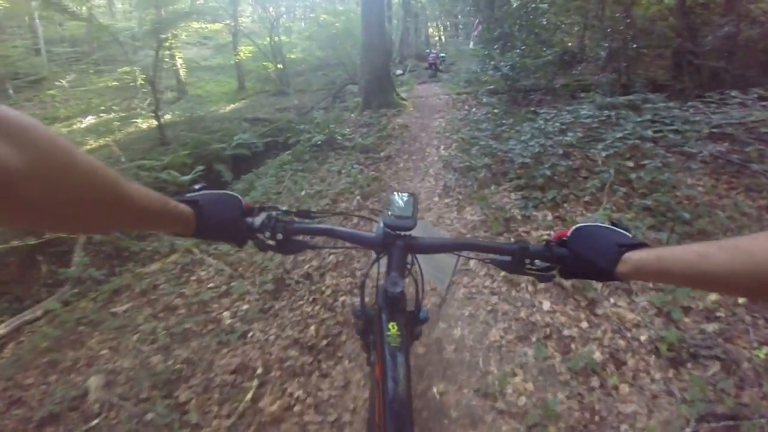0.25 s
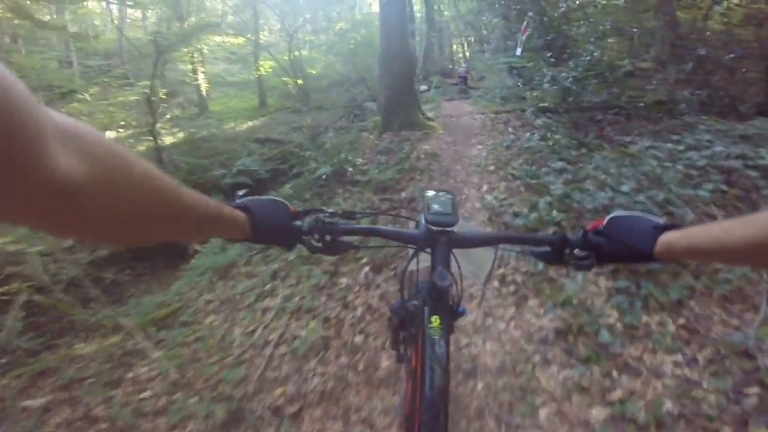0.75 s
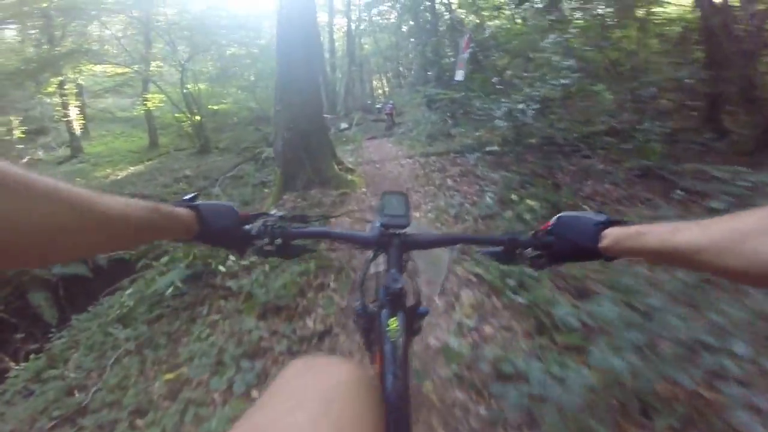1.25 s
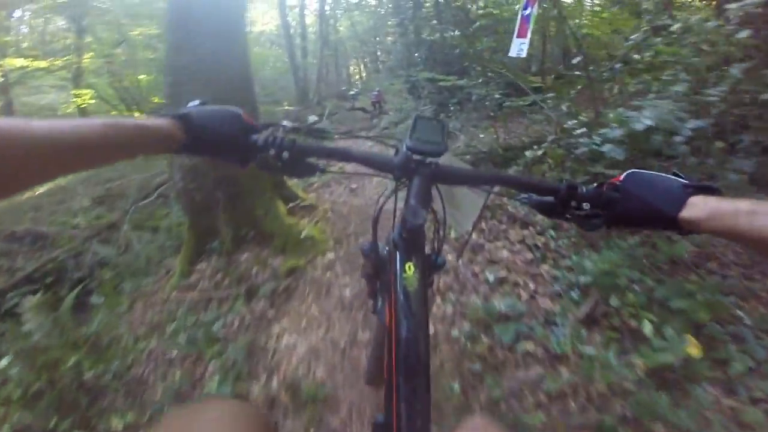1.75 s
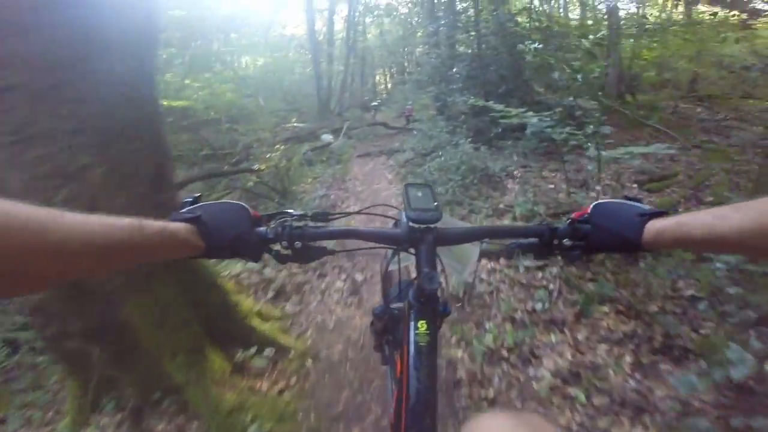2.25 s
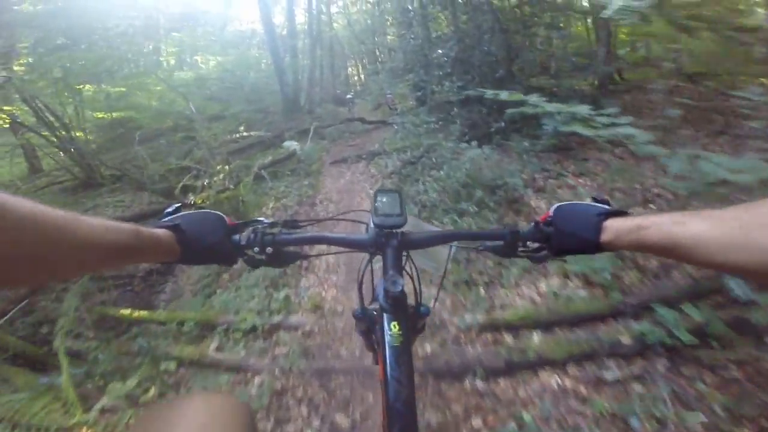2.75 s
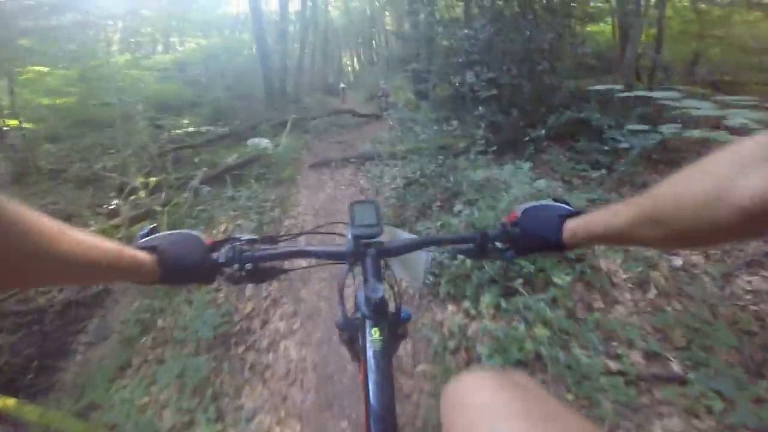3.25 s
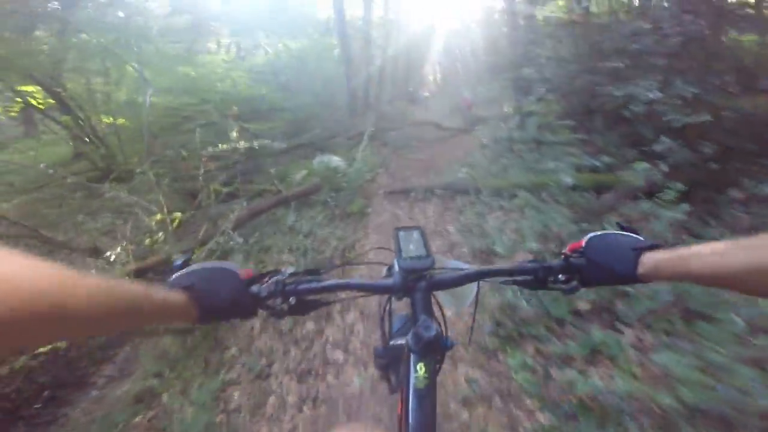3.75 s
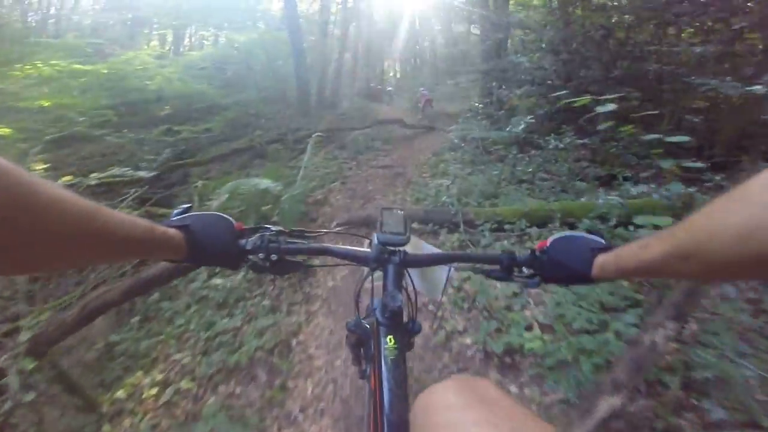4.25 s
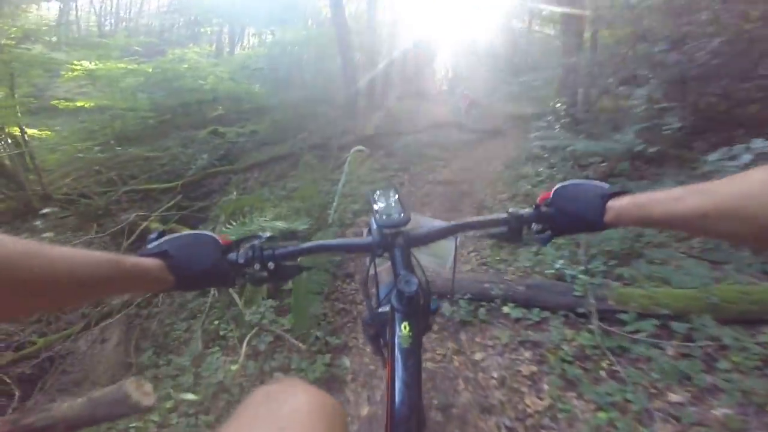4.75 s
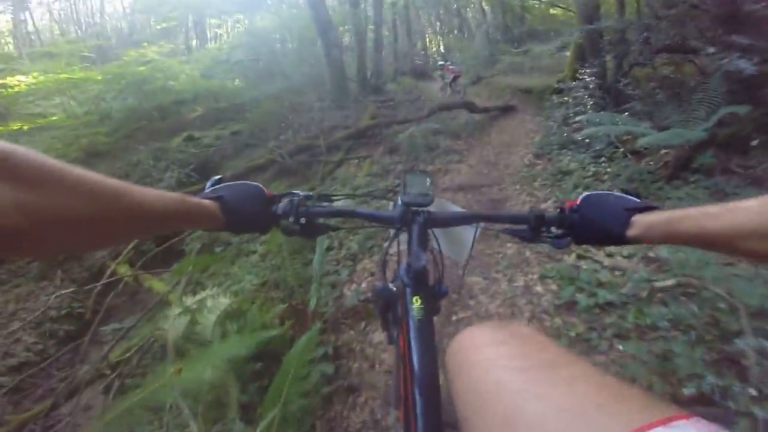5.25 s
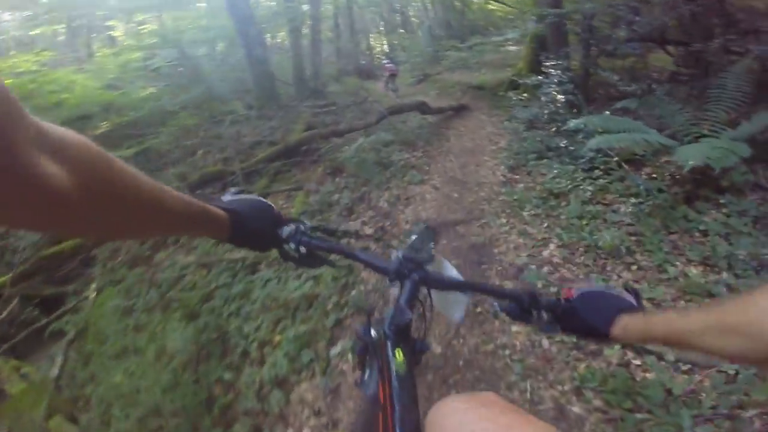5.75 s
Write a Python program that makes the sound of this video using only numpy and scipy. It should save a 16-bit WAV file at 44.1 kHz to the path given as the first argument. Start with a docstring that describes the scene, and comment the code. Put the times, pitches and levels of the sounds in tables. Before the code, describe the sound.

Close, boxed-in scuffs, rattles and faint leaf crackles over low body rumble, one early twig snap, then big jolts at about five seconds.

```python
"""Straps rub and a body sways over faint hiss and buzz throughout, with crackles, jolts and knocks scattered
among them and one ringing twig snap near the start: a camera in a closed case rides on a cyclist's chest
harness down a leafy forest trail, and little air sound gets in. Friction noise and short scrapes ring the
resonances of the case; shaped noise gives sway, shake and hiss; damped swings make the jolts, heavy over a log.
Clumped snaps make the leaves, a tearing burst the twig, a gated tone the buzz, resonant bursts the ticks."""
import sys
import numpy as np
from scipy import signal
from scipy.fft import rfft, irfft, next_fast_len
from scipy.io import wavfile
from scipy.ndimage import uniform_filter1d

SR = 44100
rng = np.random.default_rng(int(sys.argv[2]) if len(sys.argv) > 2 else 0)


def inscribe(sig):
    """Save sig as 16-bit PCM at rate SR to the path in sys.argv[1].

    A 1-D sig is mono; a 2-D sig holds one channel per row.
    Samples are clipped to [-1, 1] before scaling.
    """
    pcm = np.round(np.clip(np.atleast_2d(sig).T, -1, 1) * 32767)
    wavfile.write(sys.argv[1], SR, pcm.astype(np.int16))


N = 264361

# Resonances of the case: (frequency [Hz], width of each of two passes [Hz], level [dB])
CASE_MODES = [(330, 230, -10.5), (566, 255, -0.5), (980, 150, -10.5), (1539, 603, 8), (1850, 300, 5),
              (2277, 280, 11), (2644, 630, 3.5), (3460, 340, -7.5), (4210, 720, -7.5), (4980, 1600, -15),
              (5790, 490, -18.5), (6580, 2000, -18.5), (8700, 1900, -65), (11100, 14000, -47.5)]
# Steady rubbing of the harness, before brightness: (time [s], level [dB])
RUB_LEVEL = [(0, -61.5), (.42, -66.5), (1.1, -51.5), (1.9, -55), (2.4, -58), (3.0, -56.5), (3.55, -51),
             (3.95, -50), (4.05, -62), (4.8, -59.5), (5.1, -51.5), (5.3, -52), (5.5, -51.5), (5.99, -54)]
# Strap strokes: (start [s], length [s], level before brightness [dB], brightness [dB per octave])
STRAP_STROKES = [(0.476, 0.079, -47, -7), (0.546, 0.27, -51.5, -2), (.87, 0.13, -58, 5),
                 (1.076, 0.17, -52, 0), (1.23, 0.29, -61, 1), (1.56, 0.18, -55, -7),
                 (1.708, 0.23, -52.5, -2), (1.934, 0.091, -51.5, -3), (2.123, .14, -60.5, 7),
                 (2.47, 0.11, -58.5, -6), (2.673, .13, -47.5, -13), (2.946, 0.052, -48.5, 11),
                 (3.011, 0.14, -53, 5), (3.164, 0.099, -44.5, -4), (3.279, 0.068, -50, 7),
                 (3.389, 0.041, -46, 1), (3.472, 0.028, -49, 7), (3.555, 0.1, -54, 5),
                 (3.627, 0.25, -56, -7), (3.868, 0.13, -55, 4), (4.13, 0.34, -61, -5),
                 (4.475, 0.14, -56.5, 2), (4.668, 0.064, -56, 8.5), (4.802, 0.041, -56.5, -5),
                 (4.906, 0.15, -42, -2), (5.048, 0.059, -46, 6), (5.113, 0.087, -48, 1),
                 (5.335, 0.078, -61, -12), (5.42, 0.14, -43.5, -1), (5.64, 0.077, -66, 9),
                 (5.748, 0.062, -48.5, 3.5), (5.903, 0.15, -70, -9)]
# Body motion: (time [s], sway of the chest [dB], shake from the trail at mean rubbing [dB])
BODY_MOTION = [(0, -40.5, -48.5), (.4, -46.5, -50), (.65, -35, -51), (.82, -44.5, -50), (1.0, -37.5, -45.5),
               (1.3, -32, -47.5), (1.5, -35.5, -46.5), (1.65, -36, -49), (2.15, -43, -54),
               (2.35, -40, -45.5), (2.6, -37.5, -47), (3.0, -41.5, -46), (3.25, -31, -42), (3.5, -43, -50),
               (3.75, -30.5, -42.5), (3.95, -31, -44.5), (4.1, -39.5, -46), (4.5, -43.5, -53),
               (4.85, -42.5, -49), (5.05, -26, -42), (5.27, -38.5, -47.5), (5.5, -31.5, -45.5),
               (5.7, -37, -48.5), (5.99, -38.5, -50)]
# Spectrum of the sway: (frequency [Hz], density [dB per Hz])
SWAY_SPECTRUM = [(4, 20), (10, 10.5), (20, 13), (30, 10), (60, -13), (90, -54), (150, -59)]
# Spectrum of the shake: (frequency [Hz], density [dB per Hz])
SHAKE_SPECTRUM = [(30, -37), (60, 6.5), (130, -4), (250, -10.5), (450, -27), (800, -26.5), (1500, -70)]
# Spectrum of the hiss: (frequency [Hz], density [dB per Hz])
HISS_SPECTRUM = [(90, -38), (150, 1), (420, -2.5), (800, -9), (2200, -8.5), (3800, -17.5), (7000, -20),
                 (8000, -27.5), (10000, -26), (13200, -35.5), (15100, -37)]
# Uneven ticks of the camera's circuits: (time [s])
TICK_TIMES = [.0124, .1046, .2632, .347, .5096, .6468, .7875, .9297, 1.0629, 1.2295, 1.3477, 1.4061, 1.498,
              1.6141, 1.7488, 2.1808, 2.3245, 2.4827, 2.599, 2.7481, 2.8673, 3.0159, 3.4579, 3.8525, 4.0022,
              4.134, 4.2526, 4.4327, 4.5529, 4.6438, 4.7335, 4.8343, 4.9636, 5.2015, 5.2529, 5.417, 5.671,
              5.8021]
# Dry leaves crackling under the tyre: (start [s], length [s], level [dB])
LEAF_CLUMPS = [(0.013, 0.11, -68), (0.15, 0.036, -64.5), (0.511, 0.024, -61), (0.568, 0.042, -56),
               (0.703, 0.053, -63), (.92, 0.085, -68), (1.148, 0.029, -62), (1.216, 0.021, -59.5),
               (1.74, 0.038, -62), (1.861, 0.04, -53.5), (1.934, 0.082, -61), (2.806, 0.013, -57),
               (3.03, 0.058, -57.5), (3.174, 0.027, -55.5), (3.587, 0.077, -64), (3.65, 0.05, -61),
               (3.783, 0.062, -56), (4.165, 0.061, -62), (4.312, 0.014, -61), (4.495, 0.075, -66),
               (4.681, .025, -69), (4.808, .02, -70), (5.539, 0.015, -62), (5.64, 0.065, -60),
               (5.826, 0.095, -60)]
# Resonances of the leaves: (frequency [Hz], width of each of two passes [Hz], level [dB])
LEAF_MODES = [(4270, 1700, 1), (5740, 670, 5.5), (6670, 950, 4), (9250, 1600, -9.5)]
# One twig snap: (start [s], crest level [dB], twice the rise time of the tear [ms])
TWIG_SNAP = (.1985, -26.5, 3.2)
# Resonances of the twig: (frequency [Hz], level [dB], approximate 60 dB decay time [s])
TWIG_RESONANCES = [(1450, -2, 0.03), (2670, -4, 0.029), (2900, 4.5, 0.0097), (3480, -14, 0.0092),
                   (3880, -1.5, 0.022), (4210, -6, 0.052), (5250, -9, 0.028), (6560, -9.5, 0.019),
                   (7870, -14, 0.037), (10000, -25, 0.034)]
# Jolts through the harness: (start [s], peak level [dB], swing rate [Hz], direction of push [+1 or -1])
HARNESS_JOLTS = [(0.249, -37.5, 120, -1), (0.386, -33, 44, -1), (1.043, -28.5, 250, -1),
                 (1.09, -27, 58, -1), (1.182, -33, 58, -1), (1.269, -26, 30, -1), (1.645, -33, 48, -1),
                 (3.027, -25.5, 174, 1), (3.19, -21.5, 42, -1), (3.217, -21, 155, 1), (3.637, -31, 43, -1),
                 (3.707, -24.5, 81, 1), (3.77, -27, 180, -1), (3.886, -24.5, 75, -1),
                 (3.925, -18.5, 45, -1), (4.92, -31, 66, -1), (4.974, -22, 9.7, 1), (5.017, -7, 33, -1),
                 (5.071, -13.5, 82, 1), (5.078, -3, 136, -1), (5.084, -10, 53, 1), (5.122, -6, 228, 1),
                 (5.1246, -10, 170, -1), (5.138, -17, 25.7, -1), (5.328, -24.5, 22, -1),
                 (5.446, -22, 77, 1), (5.457, -14, 131, -1), (5.462, -11.5, 130, 1), (5.4645, -17, 38, -1),
                 (5.483, -13.5, 32, 1), (5.497, -14, 110, 1), (5.506, -16, 15, -1), (5.752, -30, 153, -1),
                 (5.926, -22.5, 16.4, -1)]
# Knocks of the mount: (start [s], crest level [dB], favoured pitch [Hz], brightness [dB per octave],
# weight of the three lowest case modes [dB])
MOUNT_KNOCKS = [(1.038, -19, 1473, 3, 8), (1.1462, -32, 1860, 8, -9), (1.1545, -37, 2350, 2, 3),
                (1.2114, -36.5, 1480, -6, 4), (1.266, -39.5, 2280, 2, 12), (1.406, -40, 1700, 9.5, -13),
                (1.4278, -34, 2030, 3, 7), (1.9915, -37.5, 2290, -7, -12), (2.175, -33, 1710, 5, 7),
                (2.25, -35, 2440, -5, -3), (2.521, -39.5, 1410, 4, 12), (2.564, -29.5, 1520, 16, 10),
                (2.732, -30, 1530, -15, -1), (2.7579, -29.5, 1500, 5.5, 0), (2.769, -35, 1700, 10, 1),
                (2.7837, -36.5, 2760, 13, -9), (2.9555, -36, 2480, 14.5, 11), (2.968, -28, 1656, 7, 7),
                (3.016, -32, 2490, 2, 5), (3.048, -32.5, 2450, 0, -6), (3.1217, -28.5, 2520, 0, 8),
                (3.212, -49, 2000, -13, 15), (3.233, -27, 2100, 14.5, 9), (3.238, -31, 2060, 15.5, 1),
                (3.2813, -30, 2500, 4, -1), (3.3981, -31.5, 1500, 8, 8), (3.4064, -29, 1690, 7, 8),
                (3.566, -33, 1640, 7, 5.5), (3.6137, -31.5, 2330, 0, -15), (3.678, -38, 1810, 6, 4),
                (3.7155, -24.5, 1460, 8.5, 10.5), (3.7453, -24.5, 2550, 7.5, -2),
                (3.795, -27.5, 2090, 3.5, 10), (3.8366, -37.5, 2350, 10, -7), (3.868, -37.5, 1630, 11, 9),
                (3.897, -29.5, 2400, 8.5, 13.5), (3.9224, -39, 2640, 15, -5), (4.4482, -40, 2560, 9, 9),
                (4.5154, -38.5, 2500, 2, -4), (4.5755, -39.5, 2290, 2, 0), (4.7045, -39.5, 1660, 2, 1),
                (4.816, -40, 1500, 5, 7), (4.9385, -35, 2260, -7, 17.5), (4.9854, -30, 1540, 11, 1),
                (5.0285, -27.5, 1370, 6, -8), (5.032, -25.5, 1550, 7, -1), (5.073, -14.5, 2000, 5, 20.5),
                (5.0805, -17, 1500, -7, 5), (5.0998, -39, 1550, 7, 2), (5.1213, -16, 2140, 6, 14),
                (5.1417, -27.5, 1820, 5, 12), (5.1667, -32, 2080, 9, 29), (5.3277, -38.5, 1530, -7, 3),
                (5.3614, -34, 1490, 7, 11), (5.4484, -33, 1400, 4, 15), (5.4529, -21.5, 1860, 5, 5.5),
                (5.487, -9, 1570, 2, 14.5), (5.4976, -32, 2190, 10, 0), (5.5087, -34, 2310, 19, 18),
                (5.5558, -33, 1340, 1, -16), (5.7624, -44.5, 2300, 8.5, -10), (5.935, -30, 2470, -1, -7)]

BRIGHT_ABOVE_HZ = 2500  # brightness slopes start here
RUB_BRIGHT_DB, BRIGHT_WANDER_DB = -1.5, 1.5  # slope of the steady rubbing and its rms wander, per octave
STROKE_EDGES = 0.76  # share of a stroke spent swelling and fading
SHAKE_FOLLOWS, MEAN_RUB_DB = 0.56, -52  # dB of shake per dB of rubbing above the mean
HISS_DB = -58
BUZZ_HZ, BUZZ_DRIFT_HZ, BUZZ_DB = 8450, 33, -79  # centre, rms drift, rms level
PICTURES_PER_S, BUZZ_CENTRE_S, BUZZ_SHARE = 59.94, .0098, .3  # gate rate, middle of a burst, share on
TICK_HZ, TICK_WIDTH_HZ, TICK_S, TICK_CREST_DB = 9900, 1100, 0.0039, -59  # crest is twice the rms
RATTLES_PER_S, RATTLE_OVER_RUB_DB = 6.9, 8.5
SCRAPE_MS, SHORTER_MS_PER_DB = 3.08, 0.02  # decay time of a knock at -37.5 dB; harder ones are shorter
EDGE_HZ = 15200  # upper band limit


def amp(db):
    """Level in decibels to amplitude ratio."""
    return 10 ** (np.asarray(db) / 20)


def evened(x):
    """Normalisation to unit rms, i.e. unit mean power."""
    return x / np.sqrt(np.mean(x ** 2) + 1e-20)


def crested(ring):
    """Normalisation by crest: the loudest 90 samples get the rms of a sine of peak 1."""
    return ring / np.sqrt(uniform_filter1d(ring ** 2, 90).max() * 2)


def curves(rows):
    """Linear interpolation of table columns at every sample."""
    s, *columns = np.transpose(rows)
    return [np.interp(np.arange(N) / SR, s, c) for c in columns]


def noise(points):
    """Spectral shaping: white noise weighted over frequency, at unit rms."""
    f, db = np.transpose(points)
    size = next_fast_len(N)
    hz = np.fft.rfftfreq(size, 1 / SR)
    shape = amp(np.interp(np.log(hz + 1), np.log(f + 1), db, left=-90))
    white = rfft(rng.standard_normal(size))
    return evened(irfft(white * shape, size)[:N])


def wobble(ms):
    """Random modulation: noise averaged twice over the given time, at unit rms."""
    span = max(int(ms * SR / 1000), 2)
    once = uniform_filter1d(rng.standard_normal(N), span)
    return evened(uniform_filter1d(once, span))


def resonate(x, hz, width_hz):
    """Forced resonance: a two-pole filter of gain 1 at its centre."""
    return signal.lfilter(*signal.iirpeak(hz, hz / width_hz, SR), x)


def resonate_twice(x, hz, width_hz):
    """Cascaded resonance: two equal filters give steep skirts."""
    return resonate(resonate(x, hz, width_hz), hz, width_hz)


def add(mix, s, sound):
    """Superposition: sums a sound into the mix from a given time."""
    part = mix[round(s * SR):][:len(sound)]
    part += sound[:len(part)]


def case(push, grit, bright_db, colour_db):
    """Modal excitation: a push through grit rings every case mode; brightness weights the upper ones."""
    out = 0
    for k, (hz, width, db) in enumerate(CASE_MODES):
        octaves_up = max(np.log2(hz / BRIGHT_ABOVE_HZ), 0)
        weighted_push = push * amp(db + colour_db[k] + bright_db * octaves_up)
        own_grit = np.roll(grit, shift=131 * k)  # the same noise, displaced for each mode
        ring = resonate_twice(weighted_push * own_grit, hz, width)
        power = np.mean(weighted_push ** 2) * width / SR  # set by push and width
        out = out + evened(ring) * np.sqrt(power)
    return out


def slips(per_s, size_db, fade):
    """Stick-slip impulses: random sudden slips, a few of them large, each fading exponentially."""
    sizes = amp(size_db * np.minimum(rng.exponential(1, N), 5))
    happens = rng.random(N) < per_s / SR
    return evened(signal.lfilter([1], [1, -fade], sizes * happens))


def strokes():
    """Amplitude-weighted mean: steady rubbing and strokes add, the louder setting the brightness [dB]."""
    level = amp(curves(RUB_LEVEL)[0])
    weighted_bright = RUB_BRIGHT_DB * level
    for s, length, db, bright_db in STRAP_STROKES:
        shape = amp(db) * signal.windows.tukey(int(length * SR), STROKE_EDGES)
        add(level, s, shape)
        add(weighted_bright, s, bright_db * shape)
    return 20 * np.log10(level), weighted_bright / level


def rub(lumps_db=1.5, slip_share=0.3, gusts_db=1.5):
    """Dry friction: lumpy slipping contact drives the case, each mode swelling as the contact wanders."""
    level_db, stroke_bright_db = strokes()
    bright_db = stroke_bright_db + BRIGHT_WANDER_DB * wobble(34)
    lumps = amp(lumps_db * wobble(4.1) + gusts_db * wobble(20))
    push = (1 + slip_share * slips(400, 2.9, 0.72)) * lumps
    grit = rng.standard_normal(N)
    wander_db = [2.5 * wobble(25.0) for mode in CASE_MODES]
    neutral = case(push, grit, 0, wander_db)  # level reference without brightness
    return amp(level_db) * case(push, grit, bright_db, wander_db) / np.std(neutral)


def motion(lumps_db=6.0):
    """Low-frequency random vibration: chest sway plus a lumpy trail shake that rises with the rubbing."""
    sway_db, shake_db = curves(BODY_MOTION)
    sway = amp(sway_db) * noise(SWAY_SPECTRUM)
    shake = evened(noise(SHAKE_SPECTRUM) * amp(lumps_db * wobble(17.3)))
    rub_db = strokes()[0]
    return sway + amp(shake_db + SHAKE_FOLLOWS * (rub_db - MEAN_RUB_DB)) * shake


def hiss():
    """Stationary noise: the steady coloured hiss of the circuits."""
    return amp(HISS_DB) * noise(HISS_SPECTRUM)


def buzz():
    """Gated frequency modulation: a narrow drifting tone switches on once in every picture."""
    place = (np.arange(N) / SR - BUZZ_CENTRE_S) * PICTURES_PER_S
    gate = 1. * (abs(place - np.round(place)) < BUZZ_SHARE / 2)
    gate = uniform_filter1d(gate, 40)  # softens the edges
    drift_hz = BUZZ_DRIFT_HZ * wobble(1.2)
    tone = np.sin(2 * np.pi * np.cumsum(BUZZ_HZ + drift_hz) / SR)
    return amp(BUZZ_DB) * evened(gate * amp(1.5 * wobble(11)) * tone)


def ticks():
    """Band-limited transients: brief windowed noise through a high resonance."""
    out = np.zeros(N)
    length = int(TICK_S * SR)
    for s, grit in zip(TICK_TIMES, rng.standard_normal((len(TICK_TIMES), 200))):
        tick = resonate_twice(grit, TICK_HZ, TICK_WIDTH_HZ)[-length:]  # once the filter has built up
        add(out, s, amp(TICK_CREST_DB) * evened(tick) / 2 * signal.windows.tukey(length, .4))
    return out


def leaves():
    """Crackling: dense random snaps in short clumps excite treble resonances."""
    clumps = np.zeros(N)
    for s, length, db in LEAF_CLUMPS:
        add(clumps, s, amp(db) * signal.windows.tukey(int(length * SR), .3))
    snaps = (.5 + slips(900, 6.0, 0.99)) * rng.standard_normal((len(LEAF_MODES), N))
    crackle = np.zeros(N)
    for grit, (hz, width, db) in zip(snaps, LEAF_MODES):
        crackle += amp(db) * resonate_twice(grit, hz, width)
    return clumps * evened(crackle)


def twig():
    """Brittle fracture: a short tearing burst rings the modes of the dry wood."""
    out, ms = np.zeros(N), np.arange(2000) * 1000 / SR
    s, db, length_ms = TWIG_SNAP
    tear = ms * np.exp(-ms / length_ms * 2)
    ring = np.zeros(len(ms))
    for hz, mode_db, t60 in TWIG_RESONANCES:
        grit = rng.standard_normal(len(ms))
        ring += amp(mode_db) * evened(resonate(tear * grit, hz, 2.4 / t60))
    add(out, s, amp(db) * crested(ring))
    return out


def jolts(damping=3.74):
    """Heavily damped oscillation: a soft push and a weak swing back, dead within two turns."""
    out = np.zeros(N)
    for s, db, hz, direction in HARNESS_JOLTS:
        turns = np.arange(int(3 * SR / hz)) * hz / SR
        swing = turns * np.exp(-damping * turns) * np.sin(2 * np.pi * turns)
        add(out, s, direction * amp(db) * swing / swing.max())
    return out


def rattles(bright_db=2.5, count=60):
    """Poisson process: small knocks at random moments follow the rubbing level; rows as in MOUNT_KNOCKS."""
    times = np.cumsum(rng.exponential(1 / RATTLES_PER_S, count))
    db = np.interp(times * SR, np.arange(N), strokes()[0]) + RATTLE_OVER_RUB_DB
    pitches = 1400 * 2 ** rng.random(count)
    return [(s, level, hz, bright_db, 0) for s, level, hz in zip(times, db, pitches) if s < N / SR]


def knocks(spread_db=2.0, rise_ms=0.92, favour_db=9.5, favour_octaves=0.1, crack=0.86, crack_ms=0.62):
    """Impact excitation: a short scrape of noise rings the case, favouring modes near one pitch."""
    out, ms = np.zeros(N), np.arange(2000) * 1000 / SR
    modes = np.transpose(CASE_MODES)[0]
    for s, db, hz, bright_db, low_db in MOUNT_KNOCKS + rattles():
        decay_ms = SCRAPE_MS - SHORTER_MS_PER_DB * (db + 37.5)
        push = (1 - np.exp(-ms / rise_ms)) * np.exp(-ms / decay_ms)
        push += crack * ms / crack_ms * np.exp(-ms / crack_ms)  # the first contact is the hardest
        favoured_db = favour_db * np.exp(-(np.log2(modes / hz) / favour_octaves) ** 2)
        chance_db = spread_db * rng.standard_normal(len(modes))
        colour_db = favoured_db + chance_db + low_db * (modes < 1200)
        ring = case(push, rng.standard_normal(len(ms)), bright_db, colour_db)
        add(out, s, amp(db) * crested(ring))
    return out


def scene():
    """Superposition of everything that reaches the microphone inside the case."""
    camera = hiss() + buzz() + ticks()
    return (rub() + motion() + camera + leaves() + twig() + jolts() + knocks())[None]


def record(dry):
    """Band limitation: a linear-phase low-pass filter."""
    lowpass = signal.firwin(511, EDGE_HZ, window=("kaiser", 9), fs=SR)
    return signal.oaconvolve(dry, lowpass[None], "same")


dry = scene()
out = record(dry)
inscribe(out)
```